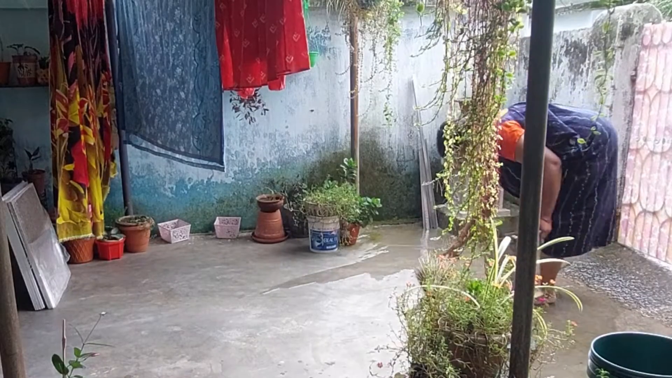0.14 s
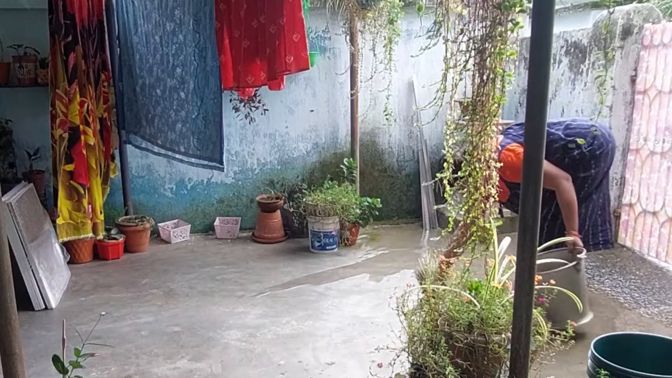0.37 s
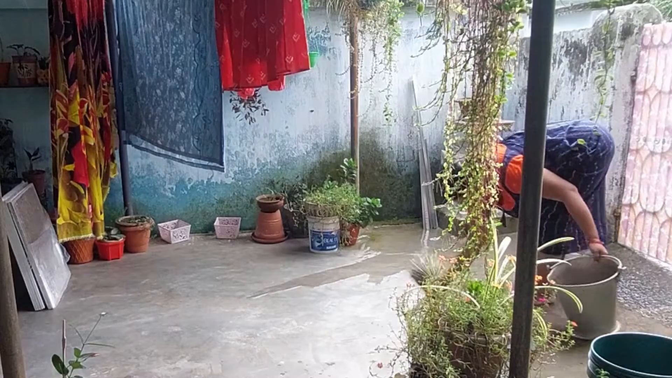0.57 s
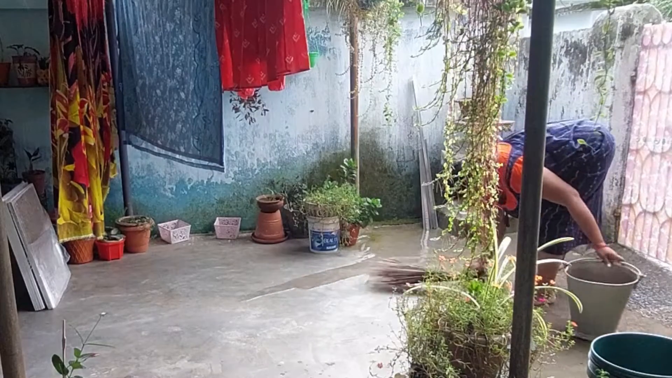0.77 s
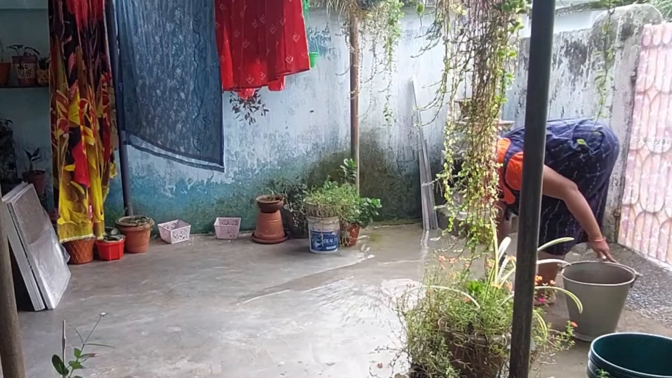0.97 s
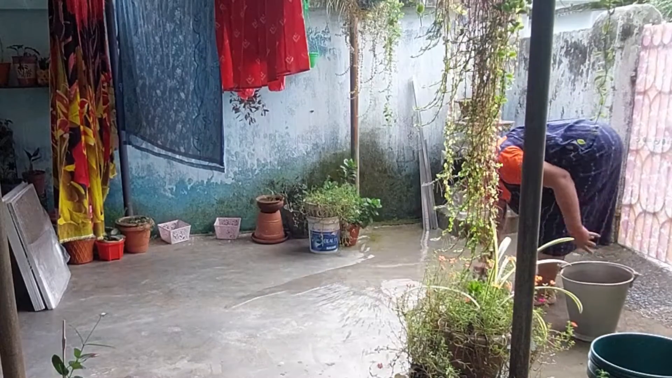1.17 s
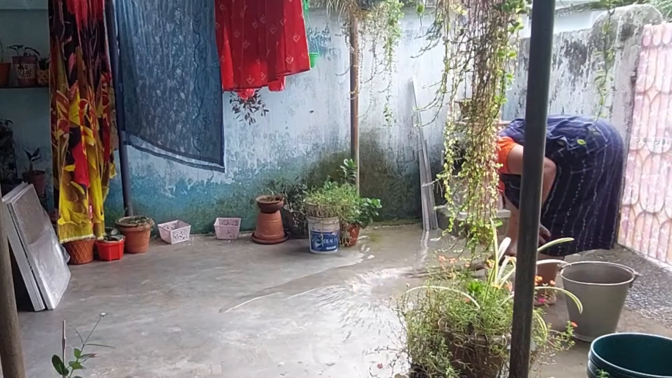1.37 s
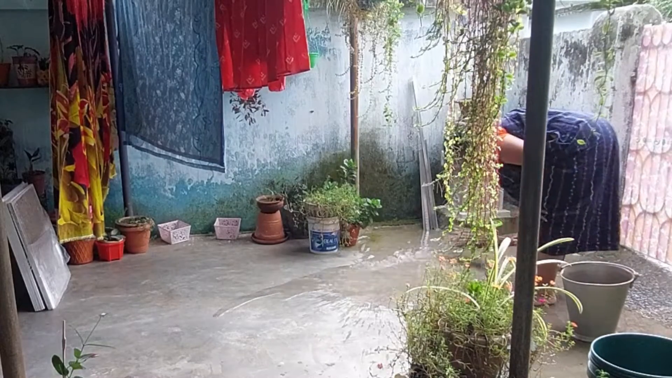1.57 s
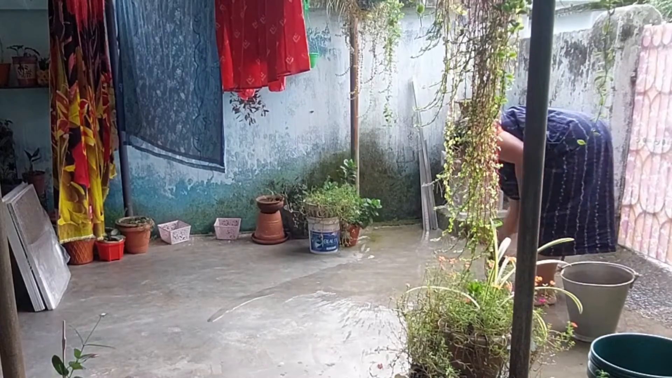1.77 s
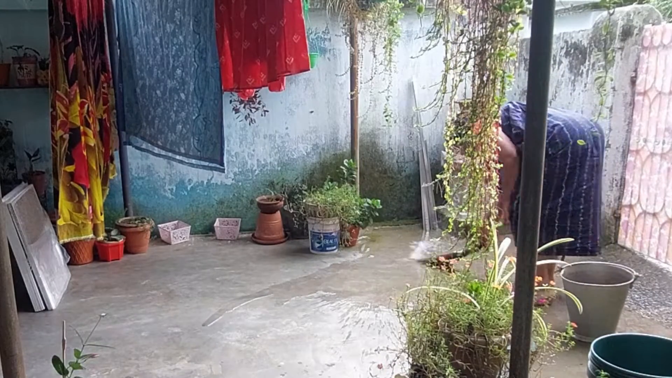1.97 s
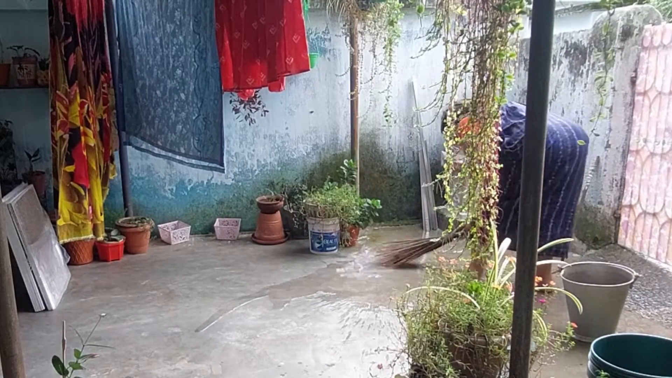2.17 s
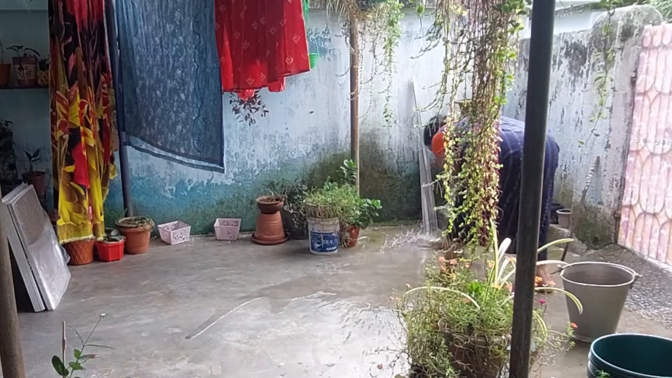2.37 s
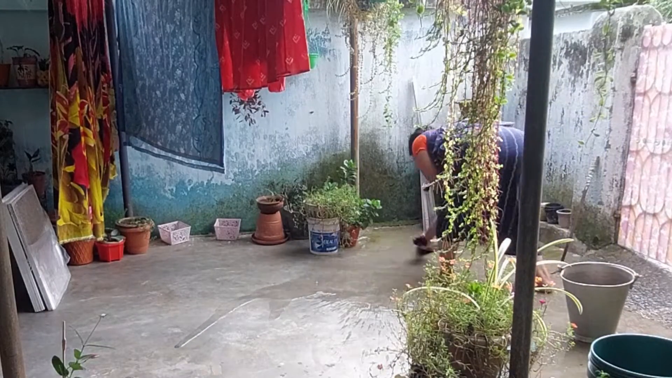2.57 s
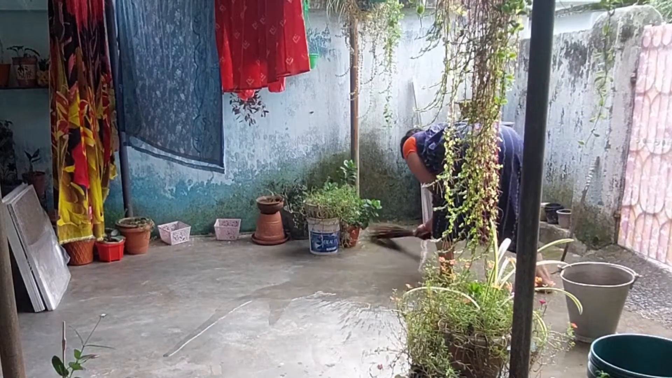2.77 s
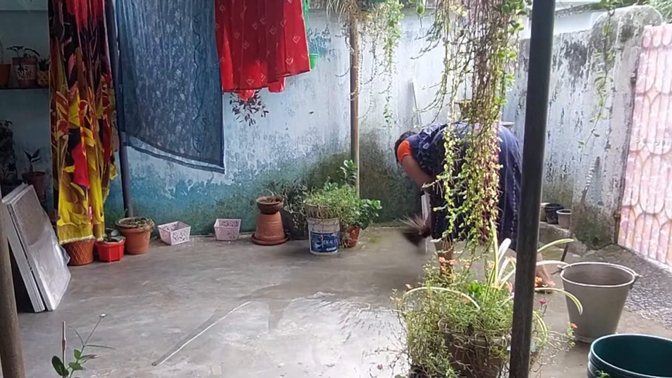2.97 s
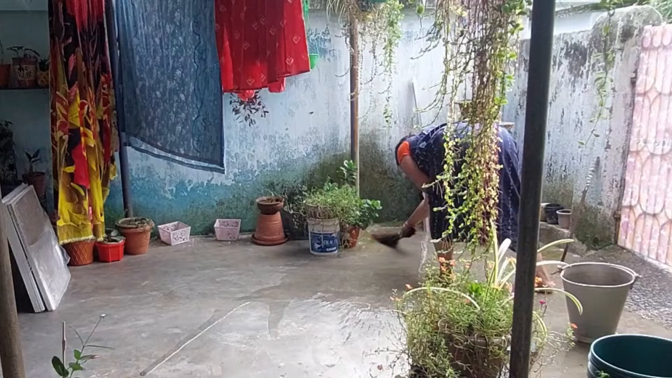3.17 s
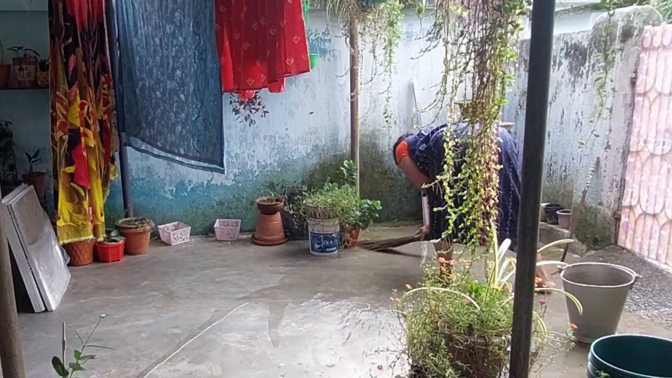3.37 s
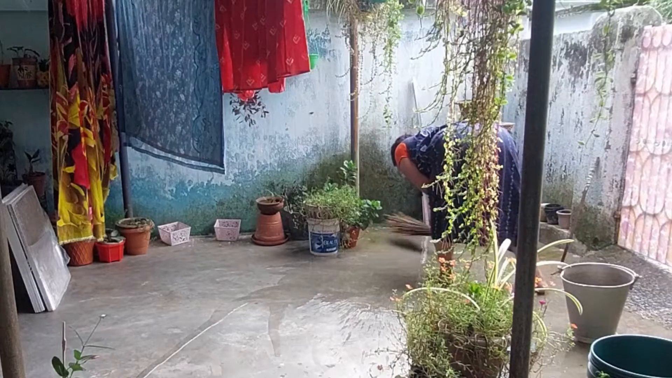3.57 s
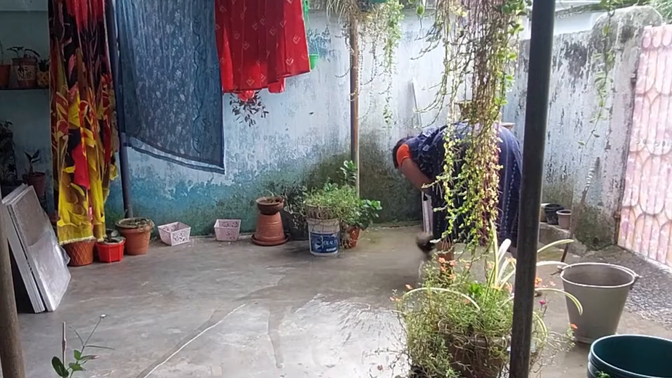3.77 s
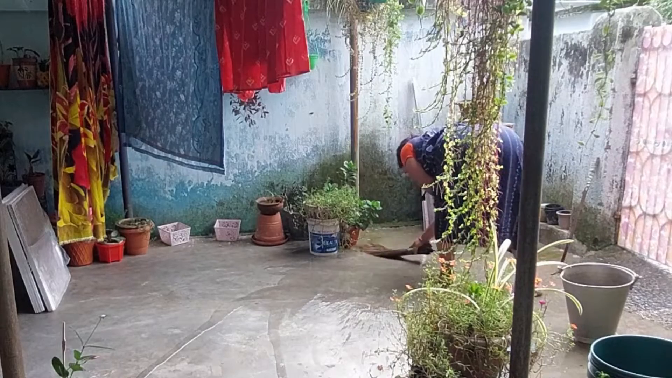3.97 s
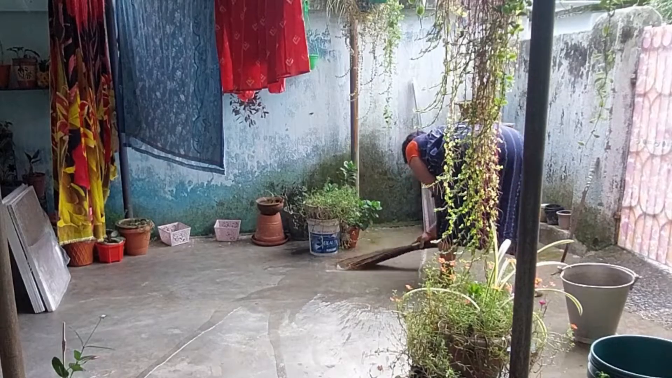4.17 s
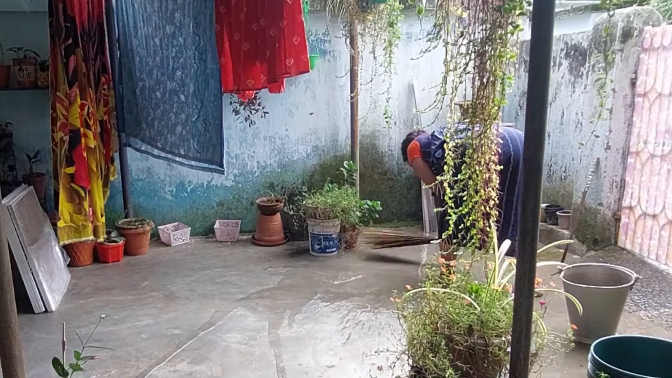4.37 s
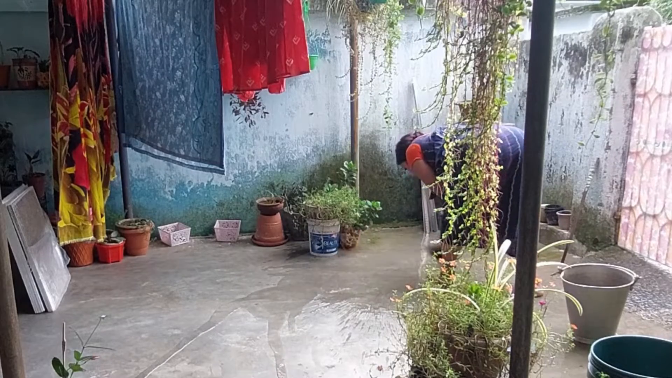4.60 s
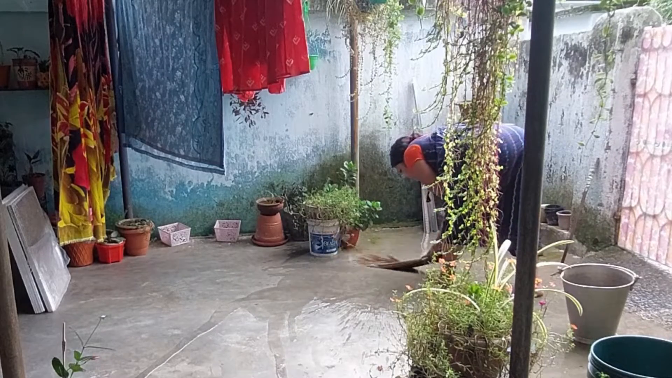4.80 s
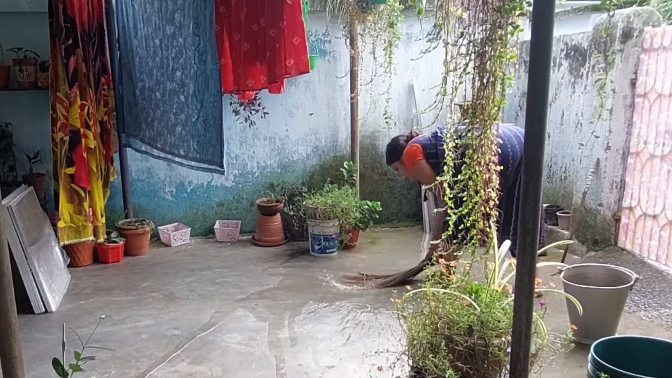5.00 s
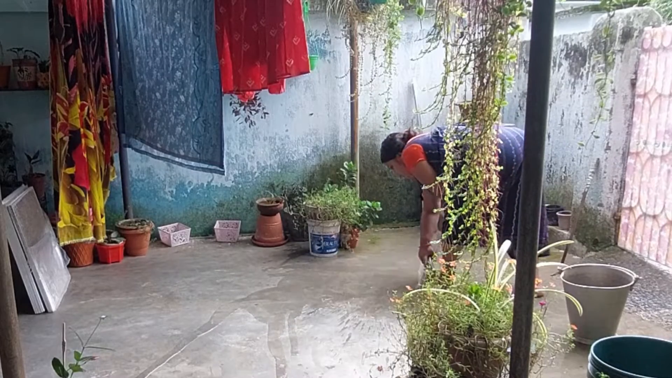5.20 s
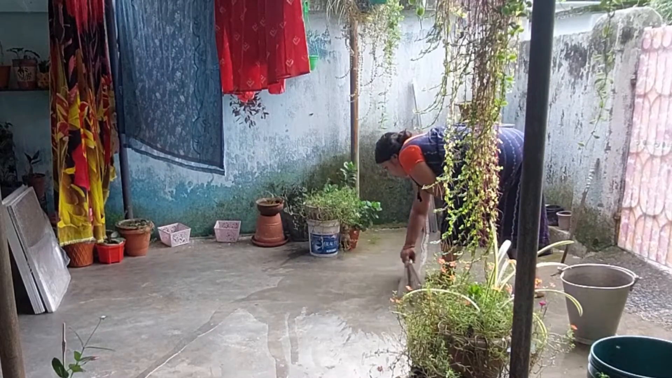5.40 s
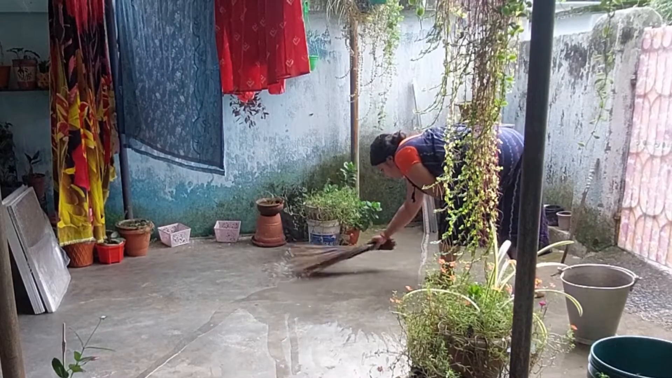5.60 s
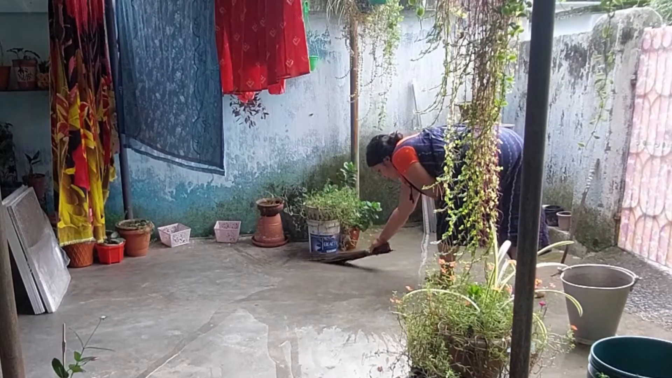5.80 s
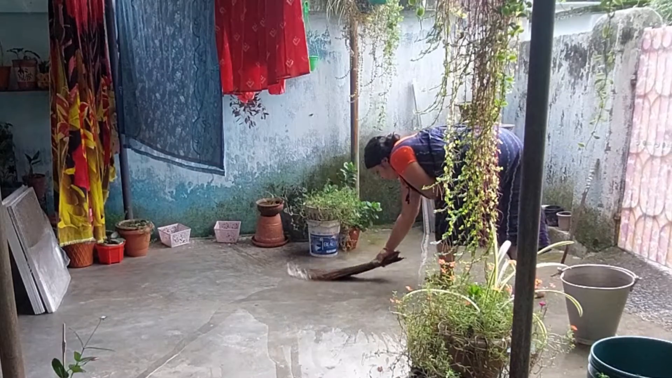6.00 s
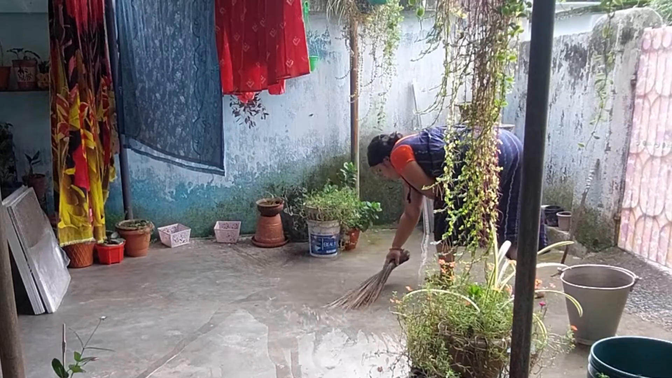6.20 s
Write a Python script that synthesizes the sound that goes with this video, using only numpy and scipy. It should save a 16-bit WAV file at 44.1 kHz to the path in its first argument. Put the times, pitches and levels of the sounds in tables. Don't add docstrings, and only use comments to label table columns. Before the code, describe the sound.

A plastic bucket is knocked and dragged with hollow thumps and squeaks, then a stick broom scrubs wet concrete in repeated gritty, splashy swishes.

```python
import sys
import numpy as np
from scipy import signal
from scipy.io import wavfile
from scipy.ndimage import uniform_filter1d

SR = 44100
rng = np.random.default_rng(int(sys.argv[2]) if len(sys.argv) > 2 else 0)


def unload_audio(sound):
    columns = np.transpose(np.atleast_2d(sound))
    steps = np.round(np.clip(columns, -1, 1) * 32767)
    wavfile.write(sys.argv[1], SR, steps.astype(np.int16))


def undo_db(level):
    steps = np.asarray(level, float) / 20
    return 10 ** steps


N = 275625
T = np.arange(N) / SR


def evened(x):
    return x / np.sqrt(np.mean(x ** 2) + 1e-20)


def drifting(size):
    return evened(uniform_filter1d(rng.standard_normal(N), size=size))


def patchy(shape, frames, bins):
    smooth = uniform_filter1d(rng.standard_normal(shape), size=frames, axis=0)
    return evened(uniform_filter1d(smooth, size=bins, axis=1))


def read(points, hz):
    f, value = np.transpose(points)
    return np.interp(np.log(hz + 1), np.log(f + 1), value)


def columns(table, t, outside=-120):
    s, *cols = np.transpose(table)
    return [np.interp(t, s, c, outside, outside) for c in cols]


def resonate(x, hz, width):
    turn = np.exp(2j * np.pi * np.cumsum(hz * np.ones(len(x))) / SR)
    r = np.exp(-np.pi * abs(width) / SR)
    return 2 * (turn * signal.lfilter([1 - r], [1, -r], x / turn)).real


def ticks(count, per_s, spread_db):
    slips = rng.random(count) < per_s / SR
    size = undo_db(spread_db * np.minimum(rng.exponential(1, count), 5))
    return evened(slips * size * np.sign(rng.standard_normal(count)))


EDGE_DB = 19.5
LIFT = 0.19


def swings(rows, t, bend):
    peak, rise, fall = np.abs(np.transpose(rows)[:3, :, None]) + 1e-4
    away = np.where(t < peak, (peak - t) / rise, (t - peak) / fall)
    return -EDGE_DB * (away ** bend + LIFT * away ** 4)


# (frequency [Hz], likeness [-1 to 1])
EAR_LIKENESS = [(60, 0.99), (180, 0.94), (550, 0.41), (1650, -0.27), (4970, -0.44), (15000, 0.01)]


def wash(colour, level_db, patchy_db):
    frames, hz = N // 512 + 5, np.fft.rfftfreq(2048, 1 / SR)
    a, b, c, d = rng.standard_normal((4, 1025, frames))
    same = np.clip(read(EAR_LIKENESS, hz), 0, 1)[:, None]
    left, other = a + 1j * b, c + 1j * d
    z = np.array([left, same * left + np.sqrt(1 - same ** 2) * other])
    patches = patchy((frames, 1025), 5, 4).T
    z *= undo_db(read(colour, hz)[:, None] + patchy_db * patches)
    return undo_db(level_db) * evened(signal.istft(z, nperseg=2048, noverlap=1536)[1][:, :N])


# (frequency [Hz], density [dB per Hz])
RUMBLE_COLOUR = [(13, -54), (22, -26), (29, -14), (38, -12), (118, 2.5), (142, -1.5), (167, -9.5),
                 (210, -11.5), (236, -11), (320, -19), (376, -17), (422, -25), (700, -51), (910, -53),
                 (1540, -120)]
# (time [s], level [dB])
TRAFFIC_LEVEL = [(0.0, -43), (.12, -42.5), (.8, -45.5), (1.06, -45), (1.25, -42), (3.0, -41.5),
                 (4.9, -42.5), (5.33, -40.5), (5.7, -44.5), (6.25, -43)]


def traffic():
    return wash(RUMBLE_COLOUR, columns(TRAFFIC_LEVEL, T, -45)[0] + 0.86, 2.3)


# (frequency [Hz], density [dB per Hz])
AIR_COLOUR = [(240, -14), (400, -6), (927, -7), (1070, -9.5), (1480, -11), (1650, -10.5), (1780, -8),
              (3590, -19), (4190, -24), (6000, -22), (13300, -31), (15700, -36), (16500, -49)]


def open_air():
    return wash(AIR_COLOUR, -57, 1.0)


# (peak time [s], rise [s], fall [s], level [dB])
HORN_GUSTS = [
    (5.31, .06, .15, -61),
    (5.44, .06, .05, -62),
    (5.58, .2, .05, -56.5),
    (5.68, .04, .15, -59),
    (5.875, .06, .14, -54),
]


def far_horn():
    db = (swings(HORN_GUSTS, T, 1.5) + np.transpose(HORN_GUSTS)[3:].T).max(axis=0)
    pitch_hz, sag_hz, settle_s = 1066, 38, 0.28
    since = np.maximum(T - HORN_GUSTS[0][0], 0)
    turns = 2 * np.pi * np.cumsum(pitch_hz - sag_hz * np.exp(-since / settle_s)) / SR
    flutter = drifting(1500)
    second_reed = undo_db(-12 + 3 * flutter) * np.sin(1.28 * turns)
    return undo_db(db + 1.5 + flutter) * (np.sin(turns) + second_reed)


# (time [s], pitch [Hz], level [dB])
CHIRPS = [
    (.505, 2500, -79),
    (.52, 2550, -64),
    (.57, 2600, -63),
    (.585, 2640, -88),
    (5.85, 3970, -90),
    (5.865, 3920, -74),
    (5.91, 3920, -75),
    (5.925, 3850, -82),
]


def bird():
    hz, db = columns(CHIRPS, T)
    return undo_db(db) * evened(resonate(rng.standard_normal(N), np.maximum(hz, 2400), 50))


# (time [s], level [dB])
INSECT_BURSTS = [
    (3.708, -101),
    (3.716, -57),
    (3.818, -57),
    (3.83, -87),
    (5.38, -89),
    (5.4, -48),
    (5.49, -62),
    (5.51, -84),
]


def insect():
    throb = 0.85 + 0.35 * np.cos(2 * np.pi * 30 * (T - 3.72))
    wing = signal.butter(5, [4900, 5780], "band", fs=SR, output="sos")
    buzz = evened(signal.sosfilt(wing, ticks(N, 5000, 2.0)))
    chorus = resonate(resonate(rng.standard_normal(N), 10100, 900), 10100, 900)
    return undo_db(columns(INSECT_BURSTS, T)[0] - 1.5) * throb * buzz + undo_db(-72.5) * evened(chorus)


# (frequency [Hz], t60 [s])
YARD_T60 = [(150, 0.38), (1000, 0.35), (4000, 0.26), (14000, 0.1)]


def yard(x):
    size = SR // 2
    taps = np.zeros((2, size))
    at = np.arange(90, size - 20, 20)
    at = at + rng.integers(0, 20, (2, len(at)))
    np.put_along_axis(taps, at, rng.choice([-1., 1.], at.shape), axis=1)
    hz, t, z = signal.stft(taps, SR, nperseg=256)
    decay = undo_db(-60 * t / read(YARD_T60, hz)[:, None])
    tail = signal.istft(z * decay, SR, nperseg=256)[1]
    tail[1] += signal.filtfilt(*signal.butter(1, 300, fs=SR), tail[0] - tail[1])
    return signal.fftconvolve(x[None], tail / np.linalg.norm(tail[0]), axes=1)[:, :N]


# (time [s], peak level [dB], pitch [Hz], t60 [s])
RIM_BITES = [
    (0.0358, -29, 5000, 0.07),
    (0.656, -17, 4150, 0.057),
    (0.68, -27, 5920, 0.15),
    (0.99, -25, 6100, 0.15),
    (0.9755, -14.5, 4400, 0.043),
    (1.121, -27, 4000, 0.075),
    (1.1706, -18, 4360, 0.035),
]


def rim_squeaks():
    out = np.zeros(N)
    for s, db, hz, t60 in RIM_BITES:
        chatter = evened(resonate(resonate(ticks(4000, 4500, 3.2), hz, 540), hz, 540))
        out[round(s * SR):][:4000] += undo_db(db - 4.5 - 60 * T[:4000] / t60) * chatter
    return out


# (peak time [s], rise [s], fall [s], hollow level [dB], wall level [dB])
DRAG_JERKS = [(0.019, 0.11, 0.024, -24, -29), (.05, 0.011, .02, -40, -12.5), (0.063, .015, .14, -19.5, -22),
              (0.203, 0.012, 0.027, -26, -28.5), (0.333, 0.07, 0.085, -32.5, -30),
              (.43, 0.12, 0.071, -33.5, -58), (0.622, 0.013, 0.11, -26, -29), (.67, 0.015, 0.21, -10, -36),
              (.77, .15, 0.044, -18.5, -30.5), (.862, 0.014, 0.078, -15, -34.5),
              (1.0, 0.014, 0.093, -12.5, -23.5), (1.038, 0.078, 0.019, -8.5, -45),
              (1.125, 0.011, 0.14, -15, -35), (1.2, 0.17, 0.045, -13.5, -37.5),
              (1.324, 0.13, 0.06, -12.5, -33), (1.358, 0.032, 0.06, -13, -36.5),
              (1.65, 0.014, 0.017, -25, -61.5)]
# (time [s], peak level [dB], wall over hollow [dB], thud pitch [Hz])
BUCKET_KNOCKS = [(0.0358, -6.5, 3.5, 396), (0.047, -12.5, -2, 920), (0.056, -8.5, -10, 285),
                 (0.203, -20, -3, 314), (0.296, -29, -1, 855), (0.617, -17.5, 4.5, 790),
                 (0.662, -3, -12.5, 333), (0.686, -9.5, -6.5, 330), (0.73, -24, -2, 285),
                 (0.749, -19, -5, 313), (0.853, -13.5, -22, 310), (0.995, -7, -9, 323),
                 (1.114, -2.5, -17, 414), (1.149, -12.5, -9, 330), (1.3, -16, -9, 340),
                 (1.653, -42.5, 0, 294), (5.936, -37.5, -1, 600)]
# (frequency [Hz], width [Hz], level [dB])
HOLLOW_MODES = [(241, 22, -4), (312, 24, 0), (395, 55, -5), (480, 50, -12), (150, 40, -22)]
# (frequency [Hz], width [Hz], level [dB])
FREE_WALL = [(425, 34, -7), (564.4, 33, 1.5), (706, 34, -15), (803, 28, 3.5), (1003, 54, -0.5),
             (1224, 47, -1.5), (1540, 120, -18), (1616, 15, -3), (1700, 39, -9.5), (2026, 15, -8.5),
             (2285, 75, -12), (2490, 62, -23)]
# (frequency [Hz], width [Hz], level [dB])
GRIPPED_WALL = [(581, 58, 0.5), (700, 73, -3.5), (792, 73, -4), (948, 34, -4.5), (1097, 31, -8),
                (1218, 130, -8.5), (1500, 63, -11), (1620, 74, -16), (1930, 89, -19), (2400, 110, -32)]
GRIPPED_S = 0.6


def drag_tone(level_db):
    low_hz, lead_hz = HOLLOW_MODES[0][0], HOLLOW_MODES[1][0]
    turns = 2 * np.pi * np.cumsum(lead_hz + 9 * drifting(500)) / SR
    hum = np.cos(turns) + 0.1 * np.cos(2 * turns) + 0.47 * np.cos(turns * low_hz / lead_hz)
    return undo_db(level_db - 7.5) * hum


def bucket():
    coarse = T[::32]
    jerks = swings(DRAG_JERKS, coarse, 1.15)
    hollow_db, wall_db = (np.interp(T, coarse, (jerks + db[:, None]).max(axis=0))
                          for db in np.transpose(DRAG_JERKS)[3:])
    held = T >= GRIPPED_S
    out = drag_tone(hollow_db) * held
    t = T[:2000]
    rattle = rng.standard_normal((len(BUCKET_KNOCKS), len(t))) * undo_db(-60 * t / 0.041)
    for s, peak_db, _, thud_hz in BUCKET_KNOCKS:
        thud = np.sin(2 * np.pi * thud_hz * t) * np.minimum(t * thud_hz, 1)
        out[round(s * SR):][:len(t)] += undo_db(peak_db - 5 - 60 * t / 0.035) * thud
    # (modes, drag level [dB], share of the wall level, when it rings, softness of contact [Hz])
    parts = ((HOLLOW_MODES, hollow_db - 8 * held, 0, 0.6, 520), (FREE_WALL, wall_db, 1, ~held, 2400),
             (GRIPPED_WALL, wall_db, 1, held, 2000))
    for modes, db, bright, when, soft_hz in parts:
        blows = np.zeros(N)
        for (s, peak_db, wall, _), burst in zip(BUCKET_KNOCKS, rattle):
            blows[round(s * SR):][:len(t)] += undo_db(peak_db + bright * wall) * burst
        click = np.eye(1, SR // 3)[0]
        rings = [undo_db(mode_db) * resonate(click, hz, width) for hz, width, mode_db in modes]
        rings = signal.lfilter(*signal.butter(2, soft_hz, fs=SR), rings)
        for k, ring in enumerate(rings / np.linalg.norm(rings)):
            jolts = undo_db(db - 4.5) * ticks(N, 900, 0.44) + (-1) ** k * undo_db(-3.5) * blows
            out += signal.oaconvolve(jolts * when, ring)[:N]
    return out


# (peak time [s], rise [s], fall [s], hiss level [dB], rasp over hiss [dB])
RIM_SCRAPES = [(.005, 0.03, 0.031, -43, 21.5), (0.038, .005, 0.05, -28, 10.5),
               (0.094, 0.096, 0.068, -30, 2.5), (.21, 0.039, 0.11, -46.5, 5.5), (.33, .1, 0.24, -57.5, 10),
               (.62, 0.0079, 0.067, -48.5, 13), (.675, 0.024, .12, -32, -2.5),
               (.856, 0.076, 0.23, -43.5, -2), (.98, 0.019, 0.078, -30.5, -7.5),
               (1.124, 0.007, .1, -37.5, 3), (1.173, 0.019, 0.049, -33.5, -6)]
# (peak time [s], rise [s], fall [s], hiss level [dB], twig rasp over hiss [dB])
BROOM_STROKES = [(1.232, 0.061, 0.12, -38.5, -6), (1.38, 0.24, 0.23, -37, -1.5),
                 (1.529, 0.23, 0.15, -33.5, -8), (1.878, 0.042, 0.056, -39, -12.5),
                 (2.103, 0.25, .19, -32.5, -10), (2.33, 0.065, .1, -51.5, -1), (2.464, 0.087, .1, -36, -9),
                 (2.592, 0.14, 0.087, -42, -4), (2.82, 0.22, 0.18, -39, -6.5),
                 (2.915, 0.15, 0.031, -40, -14), (3.187, 0.046, 0.17, -40, 0.5),
                 (3.419, 0.2, 0.19, -34.5, -7), (3.855, 0.051, 0.47, -45, -4.5),
                 (4.156, 0.23, 0.23, -37, -2.5), (4.34, 0.18, 0.064, -41, -7.5),
                 (4.655, 0.025, 0.11, -58.5, -10), (4.73, 0.11, 0.078, -47, -5),
                 (4.87, 0.079, 0.37, -38.5, -8.5), (5.09, 0.49, 0.35, -37.5, -9),
                 (5.29, 0.45, 0.19, -42, -5), (5.55, 0.062, 0.17, -44, -4),
                 (5.699, 0.26, 0.087, -40.5, -8.5), (5.97, 0.054, 0.086, -43.5, 3.5),
                 (6.2, 0.23, 0.4, -38, -7.5)]


def pressure(t):
    drop = np.vstack([swings(BROOM_STROKES, t, 1.24), swings(RIM_SCRAPES, t, 0.84)])
    peak, _, _, hiss, rasp = np.transpose(np.vstack([BROOM_STROKES, RIM_SCRAPES]))[..., None]
    by_broom = np.arange(len(peak))[:, None] < len(BROOM_STROKES)
    fizz = np.where(by_broom, -6 + 1.5 * peak, -8.5)
    fizz = fizz + 0.5 * np.tanh((peak - t) / 0.017)
    light = np.minimum(-drop, EDGE_DB)
    power = undo_db(2 * (hiss + drop)) + 1e-14
    total = power.sum(axis=0)
    share = power / total
    trickle = undo_db(2 * -66.5) * (t > 0.61)
    rasp_db = (share * (rasp + 0.2 * light)).sum(axis=0)
    fizz_db = (share * (fizz + 0.1 * light)).sum(axis=0)
    return np.sqrt(total + trickle), rasp_db, fizz_db


# (frequency [Hz], density [dB per Hz])
SCRUB_COLOUR = [(290, -55), (500, -30.5), (546, -5), (605, -34), (787, -15.5), (966, -19.5), (2690, -3.5),
                (4830, 3.5), (5930, -1), (7710, 0.5), (9330, -4), (12100, 0.5), (15100, -5), (15800, -1),
                (16500, -54)]
# (time [s], peak level [dB], t60 [s])
FLOOR_SLAPS = [
    (0.035, -28, 0.081),
    (0.202, -35, 0.073),
    (0.6555, -37, 0.099),
    (0.975, -20.5, 0.28),
    (1.8312, -55, 0.12),
    (3.145, -36.5, 0.16),
    (3.822, -39, 0.17),
    (5.9358, -33.5, 0.11),
]


def broom():
    slips = np.array([ticks(N, 14000, 3.7) for _ in range(3)])
    hz, t, z = signal.stft(slips, SR, nperseg=256, noverlap=192)
    hiss, rasp_db, fizz_db = pressure(t)
    low = 1 / (1 + (hz[:, None] / 2600) ** 6)
    high = 1 / (1 + (7600 / (hz[:, None] + 1)) ** 6)
    patches = patchy(z[0].T.shape, 30, 4).T
    colour_db = read(SCRUB_COLOUR, hz)[:, None] + low * (rasp_db + 13.5) + high * (fizz_db + 1.5)
    colour = undo_db(colour_db + 1.15 * patches)
    level = undo_db(5.5) * np.interp(T, t, hiss)
    for s, db, t60 in FLOOR_SLAPS:
        attack = np.clip((T - s) / 0.0015, 0, 1)
        level += undo_db(db - 6 - 60 * np.maximum(T - s, 0) / t60) * attack
    tips = level * evened(signal.istft(z * colour, SR, nperseg=256, noverlap=192)[1][:, :N])
    power = (colour / evened(colour).max() * np.interp(t, T, level)) ** 2
    keep = undo_db(-120 * t[1] / read(YARD_T60, hz))
    late = np.sqrt([signal.lfilter([0, 1 - k], [1, -k], p) for k, p in zip(keep, power)])
    a, b = rng.standard_normal((2, 2) + late.shape)
    echoes = evened(signal.istft((a + 1j * b) * late, SR, nperseg=256, noverlap=192)[1][:, :N])
    return tips[0], undo_db(-1.5) * tips[1:] + undo_db(-38.5) * echoes


def scene():
    sweep, spread = broom()
    pail = bucket() + rim_squeaks()
    calls = insect() + far_horn() + bird()
    direct = undo_db(-8) * sweep + pail
    echoes = yard(undo_db(-5) * pail + undo_db(-10) * calls)
    near = np.array([np.roll(direct, shift=4), direct]) + spread + echoes + calls
    far = traffic() + open_air()
    return near * undo_db([[-1.1], [1.1]]) + far * undo_db([[-0.6], [0.6]])


def band_limit(x):
    return signal.sosfilt(signal.butter(12, 17060, fs=SR, output="sos"), x)


def record(dry):
    cut = signal.sosfilt(signal.butter(3, 42, "high", fs=SR, output="sos"), dry)
    limit = signal.firwin(801, 15830, window=("kaiser", 10), fs=SR)
    mix = signal.oaconvolve(cut, limit[None], "same")
    return band_limit(mix)


dry = scene()
out = record(dry)
unload_audio(out)
```